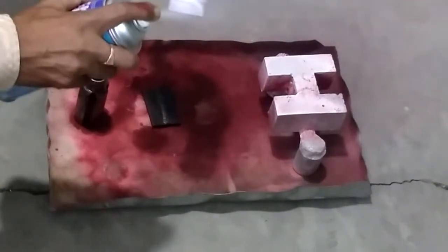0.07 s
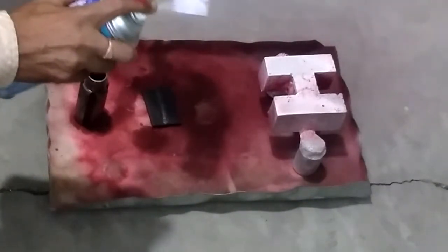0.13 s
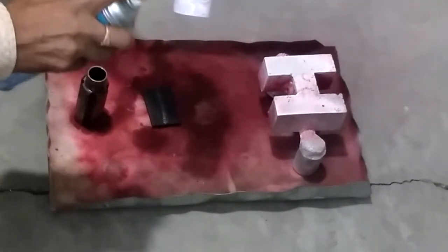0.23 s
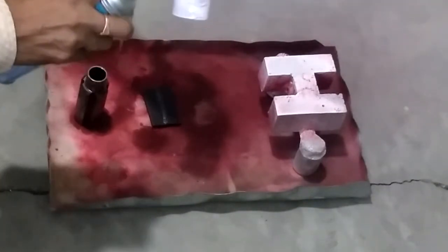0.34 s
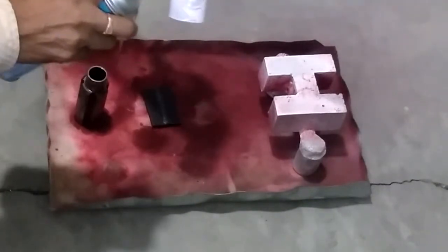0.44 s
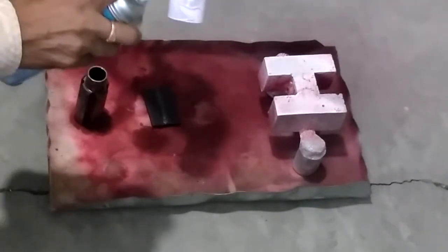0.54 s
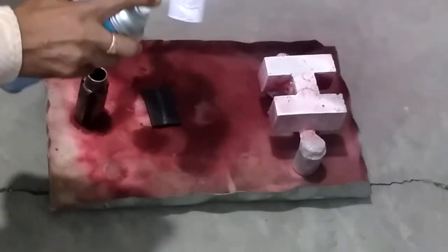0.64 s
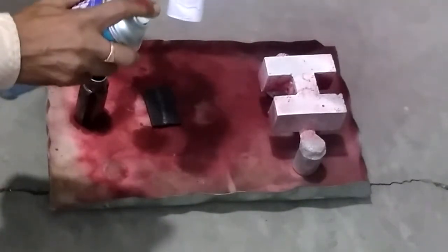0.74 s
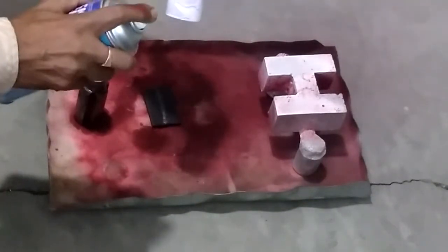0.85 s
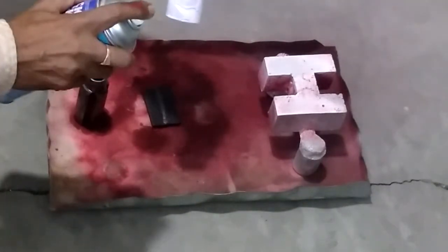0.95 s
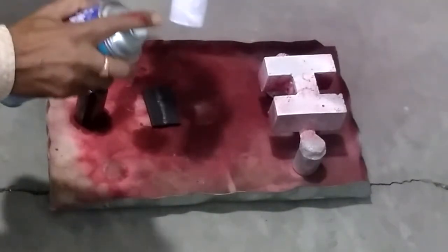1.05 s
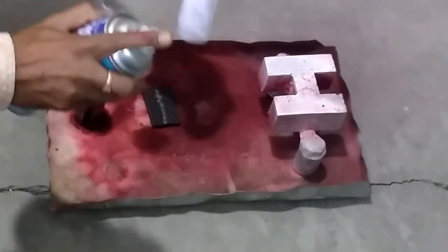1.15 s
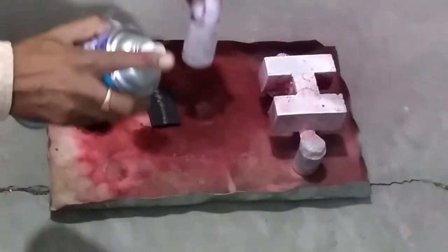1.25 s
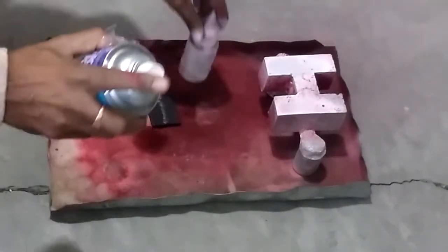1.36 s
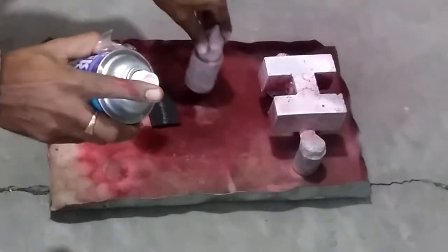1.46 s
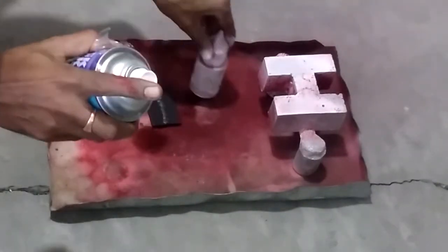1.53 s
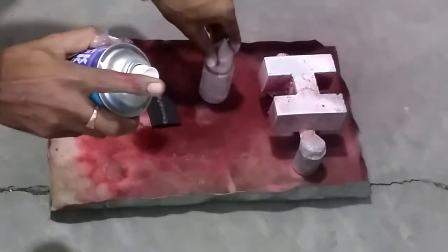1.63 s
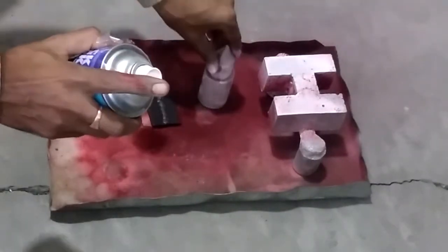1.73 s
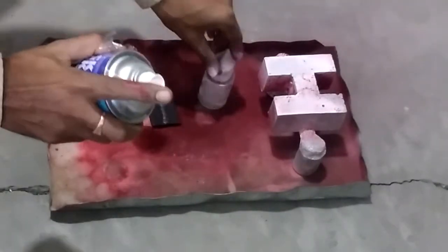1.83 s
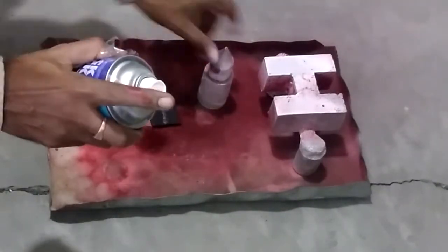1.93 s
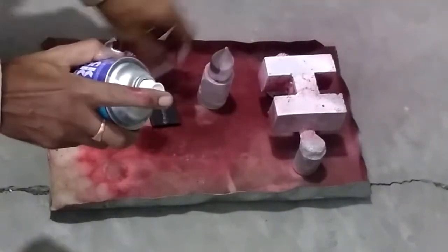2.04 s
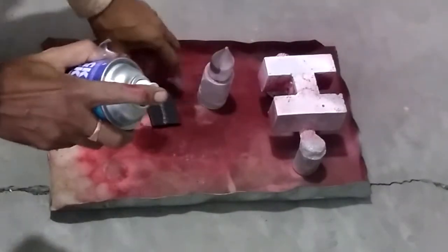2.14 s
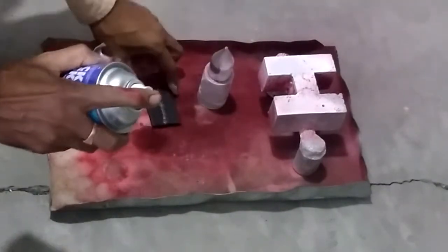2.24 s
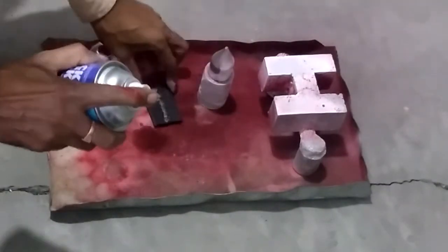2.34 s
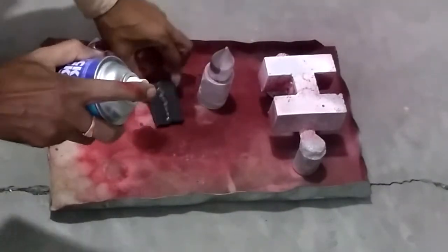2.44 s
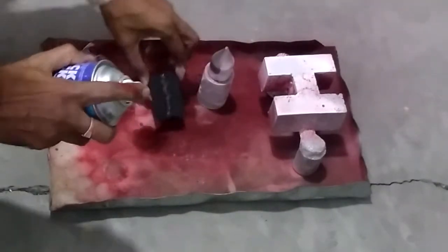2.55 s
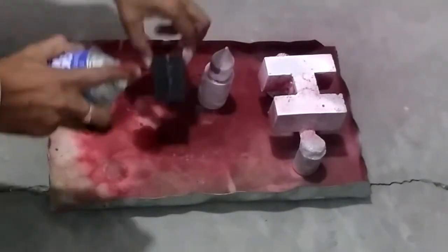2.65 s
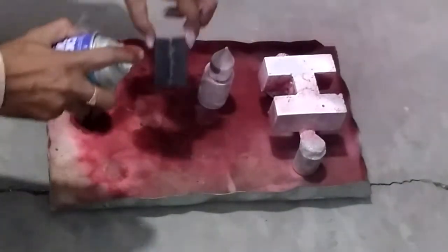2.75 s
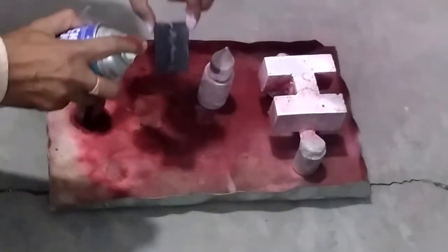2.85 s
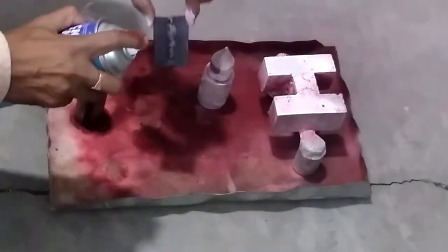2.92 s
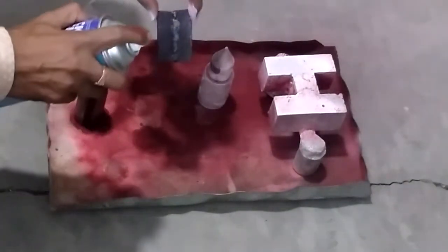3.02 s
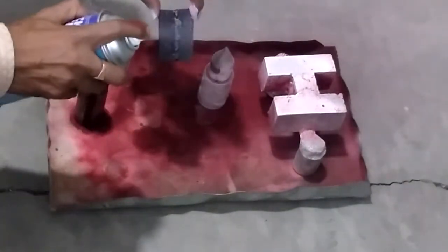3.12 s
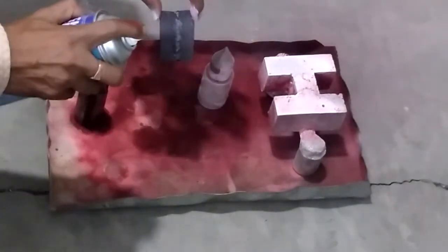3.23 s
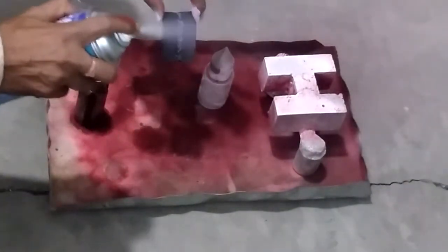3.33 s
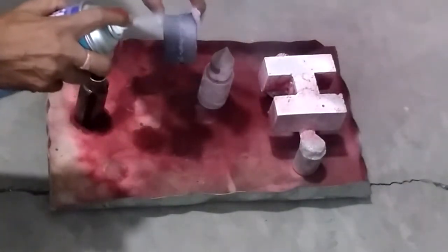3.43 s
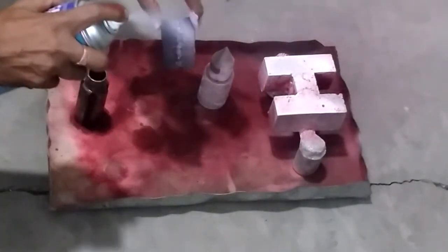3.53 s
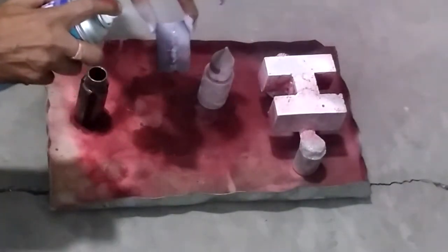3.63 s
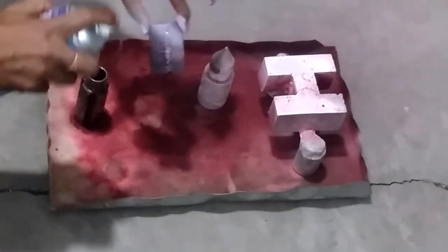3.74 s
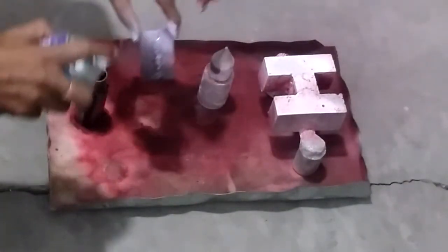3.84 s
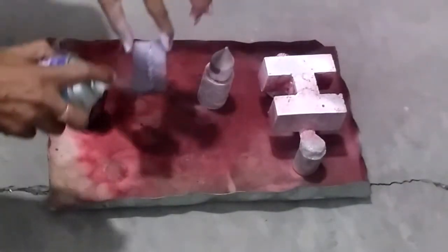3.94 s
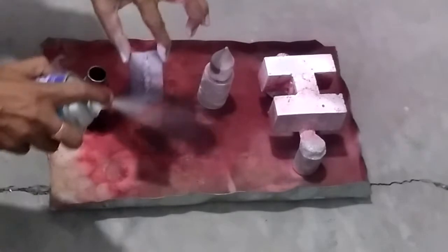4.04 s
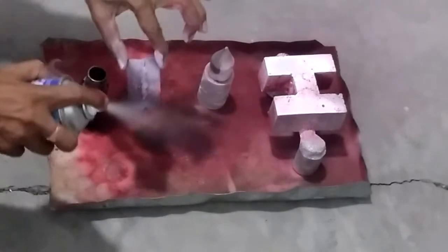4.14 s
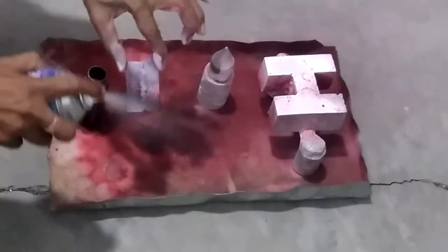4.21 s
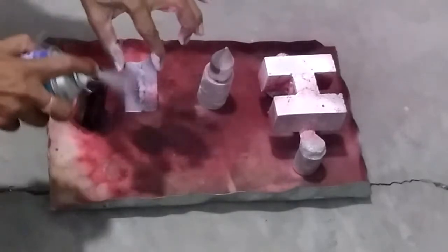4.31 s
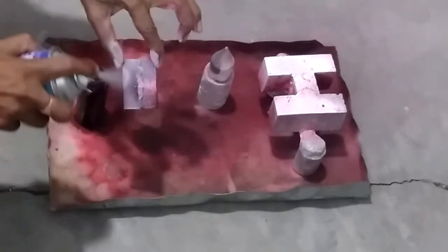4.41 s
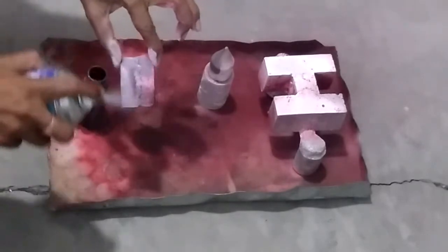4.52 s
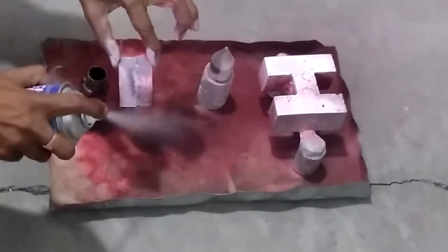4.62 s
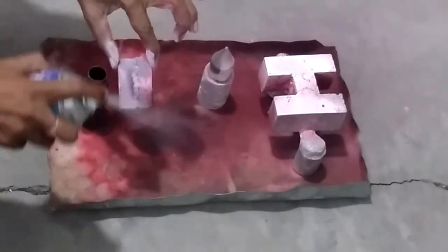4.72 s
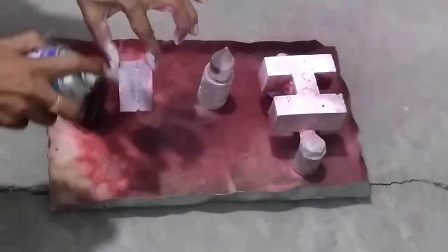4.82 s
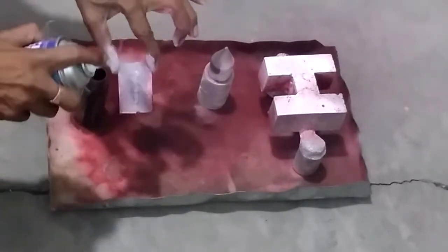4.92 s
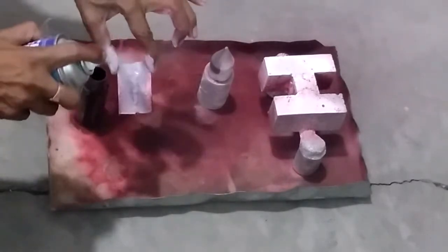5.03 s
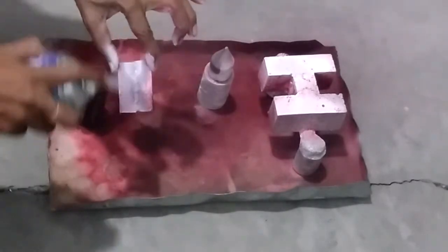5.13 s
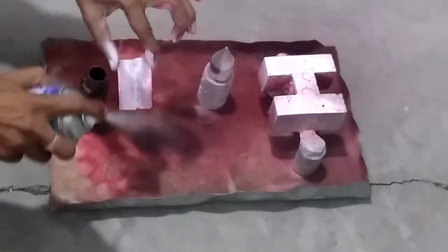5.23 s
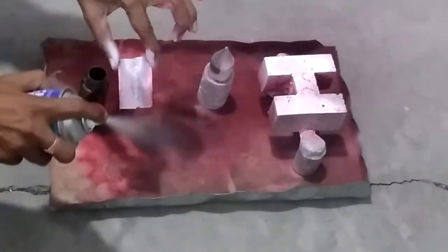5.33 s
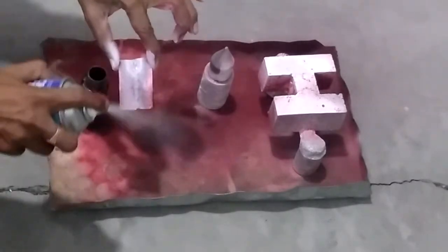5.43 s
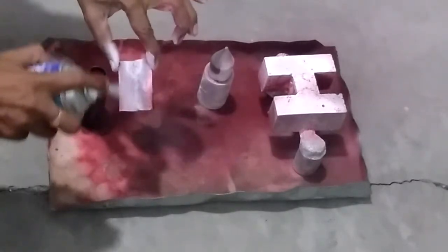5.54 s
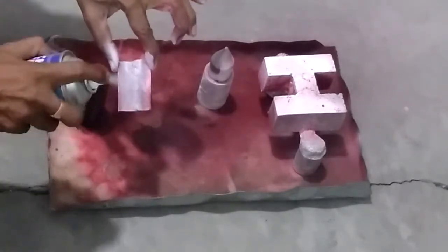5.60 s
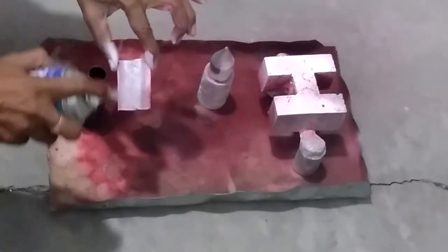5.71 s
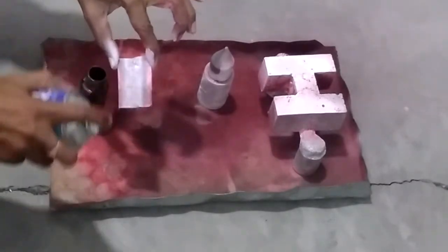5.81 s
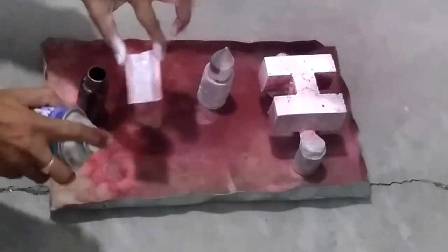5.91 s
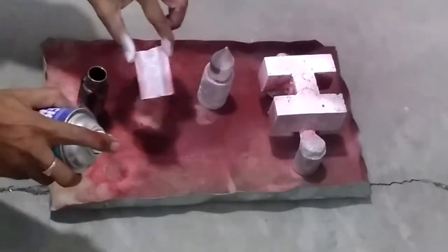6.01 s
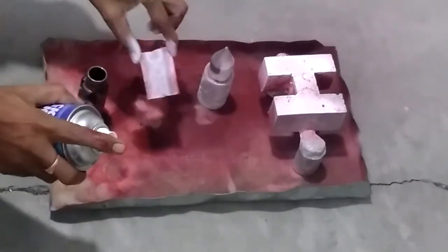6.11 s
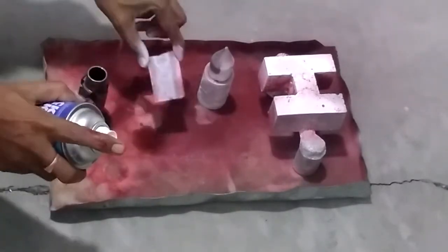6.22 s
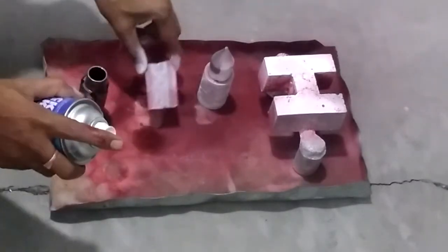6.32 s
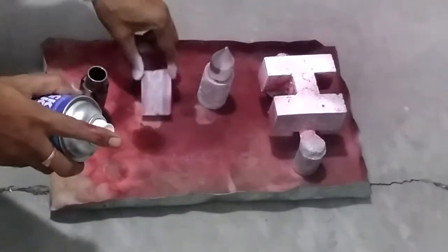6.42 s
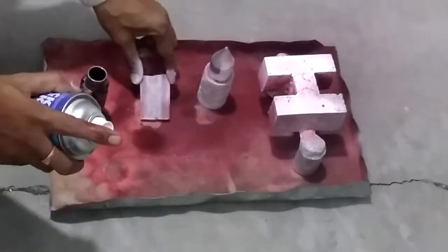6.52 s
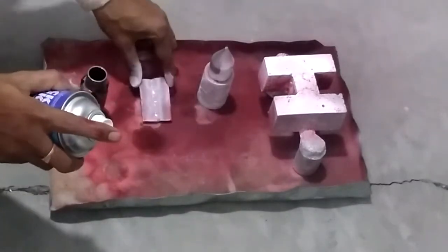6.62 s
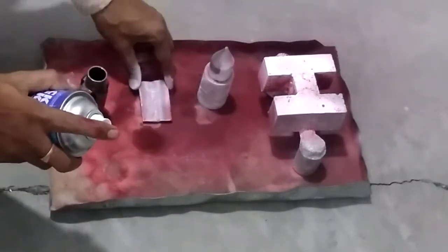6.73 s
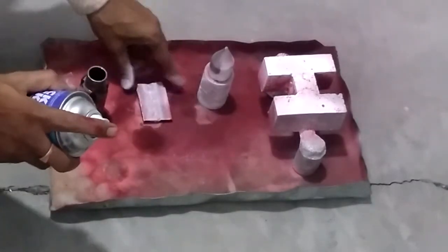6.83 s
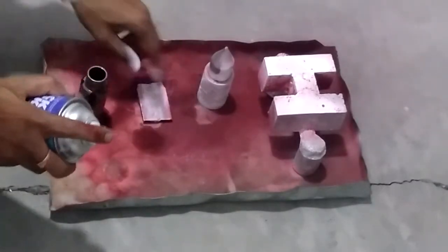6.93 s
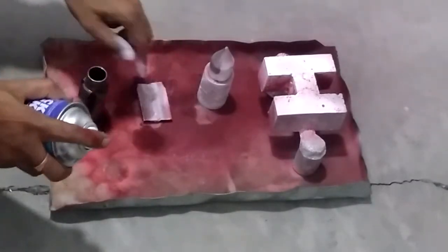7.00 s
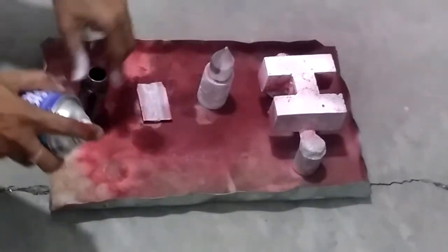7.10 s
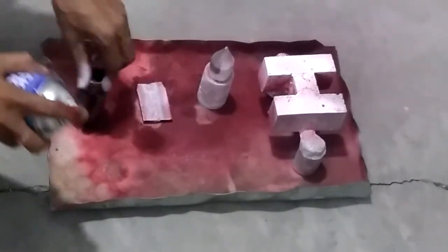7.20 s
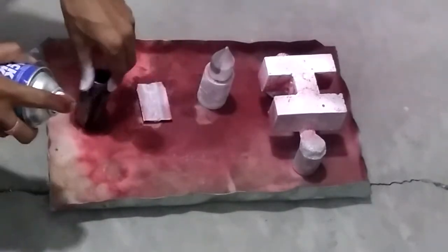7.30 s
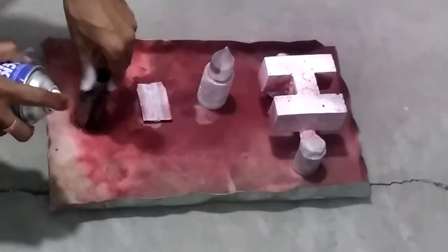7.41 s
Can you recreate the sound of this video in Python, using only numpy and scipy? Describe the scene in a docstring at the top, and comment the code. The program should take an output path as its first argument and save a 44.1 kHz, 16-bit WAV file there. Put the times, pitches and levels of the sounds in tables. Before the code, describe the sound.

A close aerosol can is already spraying at 0 s: a rushing mid-range noise with a hollow resonance near 700 Hz, a small spurt at 0.2 s, and wavering treble until it shuts off at 0.6 s with a brief room tail. Low rumble and very faint high hiss remain; a tiny metallic tick comes at 1.0 s. At 1.7-1.85 s a steel part lands in a quick bright clack. A soft drag and dull tap follow at 2.2-2.35 s with a faint low drone. At 3.0 s a longer, brighter spray begins, thin and hissy, fuller from 3.3 s, thinner around 3.8-3.9 s, then strong and hollow from 4 s until 5.7 s. The valve spits fine high chirps and a squeak until 6.2 s, over a faint drone. Dull knocks come at 6.45-6.55 s, a strong one at 6.75 s, then clatter from 7.1 to 7.45 s in the hard room.

```python
"""An aerosol can, close to two spaced microphone ports, sprays small steel parts in a hard room.
The nozzle hisses, the jet rushes over the part, and the hollow between hand and part resonates:
three shaped noises that follow the aim. The nozzle spurts, and once let go the valve spits.
After each burst, parts clatter on a board on the concrete floor, as blows into ringing modes; one drags.
A small tick, a low drone, room rumble and faint bands of steady hiss lie around the spraying."""
import sys
import numpy as np
from scipy import signal
from scipy.fft import rfft, irfft, next_fast_len
from scipy.io import wavfile
from scipy.ndimage import uniform_filter1d, map_coordinates

SR = 44100
rng = np.random.default_rng(int(sys.argv[2]) if len(sys.argv) > 2 else 0)


def digitize_waveform(pressure):
    """Quantize a signal to 16-bit integers and store it at the path in sys.argv[1].

    Rows of a 2-D input are taken as channels; values are limited to [-1, 1].
    """
    field = np.atleast_2d(pressure).T
    bounded = np.clip(field, -1, 1)
    quanta = np.round(bounded * 32767).astype(np.int16)
    wavfile.write(sys.argv[1], SR, quanta)


N = 328986

# the hollow between hand and part, sharpest when the part is low over the board:
# (time [s], resonance [Hz], sharpness [Q])
HOLLOW_TRACK = [(0, 710, 8.2), (.37, 760, 7), (.62, 625, 7.5), (3.33, 710, 6.2), (3.45, 670, 3.7),
                (3.58, 624, 3.9), (3.75, 610, 2.8), (4.03, 674, 7.1), (4.6, 668, 11.7), (5.18, 643, 10.4),
                (5.34, 724, 7.5), (5.56, 650, 11), (5.68, 674, 7.5)]
SPRAY_PATCHY_DB = 1.3  # depth of the drifting patches in jet and rush


def amp(db):
    """Decibels to gain."""
    return 10 ** (np.asarray(db) / 20)


def unit(x):
    """Scale to rms 1."""
    return x / np.sqrt(np.mean(x ** 2) + 1e-20)


def along(points, hz):
    """(frequency [Hz], value) points read on a log frequency axis."""
    f, v = np.transpose(points)
    return np.interp(np.log(hz + 1), np.log(f + 1), v)


def wobble(rate):
    """A smooth random curve, rate knots a second."""
    knots = rng.standard_normal(int(N * rate / SR) + 4)
    return map_coordinates(knots, [np.arange(N) * rate / SR])


def held(start, end, attack_s, t60):
    """A gain that rises from start, holds, and dies away after end."""
    t = np.arange(N) / SR
    return np.clip((t - start) / attack_s, 0, 1) * amp(-60 * np.maximum(t - end, 0) / t60)


def curve(rows):
    """(time [s], level [dB]) rows as one value per sample, 0 dB after the last."""
    return np.interp(np.arange(N) / SR, *np.transpose(rows), right=0)


def panned(pair, pan_db):
    """Make the left louder than the right by pan_db."""
    return pair * amp([[pan_db / 2], [-pan_db / 2]])


def filtered(x, response):
    """x times a response of frequency."""
    m = next_fast_len(x.shape[-1] + SR // 2)
    return irfft(rfft(x, m) * response(np.fft.rfftfreq(m, 1 / SR)), m)[..., :x.shape[-1]]


def noise_band(centre_hz, half_width_hz):
    """Two noises, together of rms 1, around one frequency, at half gain half_width_hz away from it."""
    noise = rng.standard_normal((2, N))
    return unit(filtered(noise, lambda hz: 1 / (1 + ((hz - centre_hz) / half_width_hz) ** 2)))


def causal(gain):
    """The minimum-phase response of a gain: it rings only after the blow."""
    cepstrum = irfft(np.log(np.maximum(gain, 1e-6)))
    half = len(cepstrum) // 2
    cepstrum[1:half] *= 2
    cepstrum[half + 1:] = 0
    return np.exp(rfft(cepstrum))


def turbulence(gain, patchy_db, size=1024):
    """Two noises, together of rms 1, coloured by gain(hz, s), with drifting patches of strength."""
    hz, s, z = signal.stft(rng.standard_normal((2, N)), SR, nperseg=size)
    field = uniform_filter1d(rng.standard_normal(z.shape[1:]), size=5, axis=0)
    field = uniform_filter1d(field, size=14, axis=1)
    coloured = z * gain(hz[:, None], s) * amp(patchy_db * unit(field))
    return unit(signal.istft(coloured, nperseg=size)[1][:, :N])


def ports(pair, focus):
    """Two spaced microphone ports share the first signal; the second, stronger at low focus, parts them."""
    # how closely left and right match at each frequency: (frequency [Hz], likeness [0-1])
    likeness = [(40, .8), (150, .3), (500, .75), (1150, .97), (1650, .6), (2050, .9), (2280, .999),
                (2850, .999), (3150, .5), (3650, .99), (4250, .5), (4680, .997), (5150, .997), (5600, .45),
                (6250, .85), (6900, .5), (7450, .98), (7950, .5), (8500, .88), (9300, .55), (15000, .65)]
    # how far the left leads: (frequency [Hz], lead [cycles])
    left_lead = [(50, -.5), (450, -.1), (1350, 0), (1750, .25), (2150, .49), (2850, .51), (3500, .98),
                 (3900, 1.02), (4700, 1.48), (5150, 1.52), (6250, 2), (8500, 3), (9700, 3.38),
                 (10600, 3.55), (11800, 4), (15400, 5.5)]
    # left over right: (frequency [Hz], level [dB])
    left_over_right = [(200, -1), (600, 1), (1150, -0.5), (1650, -6.5), (2250, 0), (5200, 0), (5900, -1.5),
                       (8300, -0.5), (9700, -5.5), (15000, -4.5)]

    def split(hz):
        turn = np.arccos(np.clip(focus * along(likeness, hz), 0, 1)) / 2
        return np.array([np.cos(turn), np.sin(turn)])

    sign = np.array([[1], [-1]])  # left, right

    def spacing(hz):
        lead = np.exp(1j * np.pi * sign * np.interp(hz, *np.transpose(left_lead)))
        return lead * amp(sign * along(left_over_right, hz) / 2)

    shared, apart = filtered(pair, split)
    return filtered(shared + sign * apart, spacing)


def room(direct, hold_s, early_t60, late_t60, late_db, size=1):
    """A fresh pair of responses, for the shared and the parting signal: near reflections, duller far walls."""
    reflections_per_s, wall_hz = 4000, 4500
    t = np.arange(SR * 3 // 4) / SR
    # the near reflections keep full strength for hold_s, then fade
    fade = amp(-60 * np.maximum(t - hold_s, 0) / early_t60)
    arrives = rng.random((2, len(t))) < reflections_per_s / SR
    early = rng.standard_normal((2, len(t))) * arrives * fade
    late = filtered(rng.standard_normal((2, len(t))), lambda hz: 1 / np.hypot(1, hz / wall_hz))
    late = late * amp(late_db - 60 * t / late_t60)
    response = early / np.linalg.norm(early, axis=1, keepdims=True) + late / np.linalg.norm(fade)
    # the direct sound, softened over size samples, goes to the shared signal alone
    pulse = np.hanning(size + 2)[1:-1]
    response[0, :size] += direct * pulse / pulse.sum()
    return response


def in_room(hits, **settings):
    """Hits heard directly and by way of the room."""
    return signal.fftconvolve(hits[None], room(**settings), axes=1)[:, :N]


def hollow_bell(hz, s, ratio, q):
    """A resonance peak at ratio times the hollow's pitch, which shifts with the hand."""
    hollow_s, hollow_hz, _ = np.transpose(HOLLOW_TRACK)
    centre_hz = np.interp(s, hollow_s, ratio * hollow_hz)
    return 1 / (1 + (q * (hz / centre_hz - centre_hz / (hz + 1))) ** 2)


def reflected(x):
    """x and its reflection off the board: a comb that shifts as the can moves."""
    # lag of the reflection: (time [s], lag [ms])
    board_lag = [(0, 1.17), (.2, 1.22), (.6, 1.19), (3.0, 1.55), (3.6, 1.5), (4.0, 1.15), (4.3, 1.2),
                 (4.7, 1.21), (4.98, 1.27), (5.25, 1.12), (5.7, 1.16)]
    echo_db = -18
    t = np.arange(N) / SR
    lag_s = np.interp(t, *np.transpose(board_lag)) / 1000
    return x + amp(echo_db) * np.array([map_coordinates(c, [(t - lag_s) * SR]) for c in x])


def jet():
    """The nozzle's turbulent hiss, combed by its reflection off the board."""
    # colour of the hiss: (frequency [Hz], level per Hz [dB])
    jet_colour = [(300, -44), (2000, -33), (4000, -15), (6500, -6.5), (7500, -4.5), (9300, -4.5),
                  (10000, 0), (11200, 0.5), (12300, -3.5), (13200, 3.5), (14300, -1.5), (15600, -0.5)]
    # extra hiss while the round pin is sprayed: (time [s], level [dB])
    pin_treble = [(0, 0), (.12, 1.5), (.23, -4.5), (.34, 4.5), (.46, 6.5), (.56, 4), (.62, -4), (.8, 14)]
    hiss = turbulence(lambda hz, s: amp(along(jet_colour, hz)), patchy_db=SPRAY_PATCHY_DB)
    return amp(curve(pin_treble)) * reflected(hiss)


def rush(part_colour):
    """The jet breaks into noise on the part, whose reflection weakens a band above the hollow's pitch."""
    def colour(hz, s):
        return amp(along(part_colour, hz)) * amp(-7 * hollow_bell(hz, s, ratio=1.58, q=8.5))
    return turbulence(colour, patchy_db=SPRAY_PATCHY_DB)


def hollow():
    """The jet blows the air between hand and part into an unsteady resonance."""
    hollow_s, _, hollow_q = np.transpose(HOLLOW_TRACK)

    def resonance(hz, s):
        q = np.interp(s, hollow_s, hollow_q)
        # a blunter hollow spreads its power over a wider band
        return np.sqrt(q) * hollow_bell(hz, s, ratio=1, q=q) ** 0.59

    return amp(1.3 * wobble(14)) * turbulence(resonance, patchy_db=1.0, size=2048)


def spray():
    """The valve gates hiss, rush and hollow together, and the aim sets how strongly each sounds."""
    # presses of the nozzle: (start [s], end [s], jet level [dB], rush level [dB], hollow level [dB],
    # jet left over right [dB], focus of rush and hollow [0-1])
    bursts = [(-0.02, 0.619, -43, -39.5, -42, 1.5, 0.95), (3.002, 5.694, -31, -38, -39.5, 0.5, 1)]
    # rush on the round pin, then on the flat block, each: (frequency [Hz], level per Hz [dB])
    part_colours = [
        [(40, -40), (200, -24), (450, -7), (950, -1), (1400, -4), (1800, -3), (2050, -6), (2400, 3), (2700, -1),
         (3080, -16), (4000, -8), (5700, -10), (7400, -22), (15000, -26)],
        [(40, -40), (200, -18), (450, -7), (850, -3), (1150, 0), (1950, -2.5), (2300, 2), (2680, 2.5),
         (2950, -11), (3400, -5), (4400, -4.5), (5800, -8.5), (7500, -14), (15000, -22)],
    ]
    # how fully the jet meets the part; it slips past the edge twice: (time [s], level [dB])
    aim = [(0, 1), (.6, -1), (3.01, -16), (3.13, -9), (3.23, -9.5), (3.275, -1), (3.6, -1.5), (3.81, -11),
           (3.91, -9.5), (3.99, 0.8), (4.1, 0.5), (4.17, -1), (4.35, -1), (4.42, 0.5), (4.52, -.5),
           (4.68, 1.5), (4.88, -2.5), (5.33, 1), (5.48, -.5), (5.7, -1)]
    hollow_follows = 1.8  # dB of hollow for each dB of aim
    open_s, shut_t60 = 0.008, 0.16  # the valve snaps open and shuts a little slower
    hang_db, hang_t60 = -7, 0.3  # the room holds the spray for a moment
    aim_db = curve(aim)
    out = np.zeros((2, N))
    for (start, end, jet_db, rush_db, hollow_db, jet_pan_db, focus), colour in zip(bursts, part_colours):
        hang = amp(hang_db) * held(start, end, open_s, hang_t60)
        valve = np.maximum(held(start, end, open_s, shut_t60), hang)
        hiss = amp(jet_db + aim_db) * jet()
        on_part = amp(rush_db + aim_db) * rush(colour)
        in_hand = amp(hollow_db + hollow_follows * aim_db) * hollow()
        out += valve * (panned(ports(hiss, focus=1), jet_pan_db) + ports(on_part + in_hand, focus))
    # paint and gas leave the nozzle unevenly
    return out * amp(0.54 * wobble(40) + 0.16 * wobble(360))


def background():
    """Low room rumble, a drone that comes and goes, and two faint steady bands of high hiss."""
    # colour of the rumble: (frequency [Hz], level per Hz [dB])
    rumble_colour = [(25, -36), (55, -27), (78, 0), (130, -1), (230, -0.5), (400, -9), (700, -14.5),
                     (1200, -23.5), (2000, -24.5), (2450, -27.5), (2900, -22.5), (3500, -28.5), (6000, -34),
                     (15500, -39.5)]
    # swells of the drone: (start [s], end [s], level [dB])
    drone_swells = [(1.97, 2.674, -50.5), (5.95, 6.403, -54.5)]
    # steady hiss: (frequency [Hz], half-width [Hz], level [dB])
    hiss_bands = [(8710, 380, -72.5), (9700, 330, -78.5)]
    rumble = turbulence(lambda hz, s: amp(along(rumble_colour, hz)), patchy_db=1.03)
    rumble = rumble * amp(-48.0 + 0.6 * wobble(2.255))  # a slow drift in level
    swells = sum(amp(db) * held(start, end, attack_s=0.096, t60=0.83) for start, end, db in drone_swells)
    drone = swells * (noise_band(121.0, 6.1) + amp(0.5) * noise_band(212, 130))
    hiss = sum(amp(db) * noise_band(hz, half_width_hz) for hz, half_width_hz, db in hiss_bands)
    return rumble + drone + hiss


def spurts():
    """Short puffs of coloured noise from the nozzle."""
    # on a clot of paint, and as the nozzle opens: (time [s], level [dB])
    puff_times = [(.218, -39), (3.002, -48)]
    # colour of a puff: (frequency [Hz], level per Hz [dB])
    puff_colour = [(200, -25), (750, 1), (1500, -9), (3000, -5), (7000, -15), (13000, -1)]
    puffs = sum(amp(db) * held(s, s + 0.0029, attack_s=0.0013, t60=0.035) for s, db in puff_times)
    noise = rng.standard_normal((2, N))
    return puffs * unit(filtered(noise, lambda hz: amp(along(puff_colour, hz))))


def tick():
    """One short metallic ring of narrow noise while the can is turned."""
    # (time [s], level [dB], pitch [Hz], t60 [s])
    can_tick = (1.03, -53.5, 2900, .12)
    s, db, pitch_hz, t60 = can_tick
    return amp(db) * held(s, s, attack_s=0.0017, t60=t60) * noise_band(pitch_hz, 300)


def board(hz, bright_hz, thud_db):
    """A soft contact loses its treble; a flat, heavy one pushes the low end; each blow finds the modes anew."""
    # colour of a blow as it reaches the ports: the board's own colour, with a lift near 8.8 kHz from the ports:
    # (frequency [Hz], level per Hz [dB])
    board_colour = [(60, -27.5), (160, -32), (230, -14.5), (330, -14), (410, -19), (500, -10), (660, -9),
                    (780, -10), (1020, 0.5), (1400, -6), (1900, -3.5), (2300, -7), (2800, -10),
                    (3300, -9.5), (5000, -15.5), (6300, -16.5), (7500, -19.5), (8800, -15), (10500, -16.5),
                    (15500, -23)]
    # resonances of board and parts: (frequency [Hz], width [Hz], lift before scatter [dB])
    modes = [(238, 25, 7), (328, 25, 6), (525, 20, 5), (598, 14, 10), (695, 14, 8), (840, 14, 7),
             (1047, 14, 7), (1143, 22, 11), (1222, 20, 4), (1313, 16, 9), (1403, 16, 6), (1470, 16, 6),
             (1514, 16, 6), (1626, 22, 8), (1812, 20, 6), (1942, 40, 7), (3080, 50, 4), (3371, 16, 7),
             (4340, 18, 7)]
    scatter_db, thud_hz = 1.8, 780
    ring = 1
    for f, width, db in modes:
        lift = amp(db + scatter_db * rng.standard_normal()) - 1
        ring = ring + lift / (1 + (2 * (hz - f) / width) ** 2)
    # the steel edge always adds a little click, stronger for a brighter contact
    edge = amp(-23.5) * bright_hz / 3000
    contact = np.hypot(1 / np.sqrt(1 + (hz / bright_hz) ** 4.6), edge)
    thud = thud_db / (1 + (hz / thud_hz) ** 4)
    return causal(amp(along(board_colour, hz) + thud) * ring * contact)


def knocks():
    """Steel parts land on the board and rock from edge to edge, each further contact weaker."""
    # parts set down: (time [s], relative level [dB], contact brightness [Hz], thud [dB], rebound [0-1])
    landings = [(1.681, -14.5, 4300, -11, 0), (1.693, -16.5, 6460, -9, 0), (1.704, -17.5, 5500, -9, 0.15),
                (1.830, -19, 5530, -0.5, 0.38), (2.170, -46, 1660, 3.5, 0.2), (2.236, -48, 2200, 0, 0.3),
                (2.333, -26.5, 1870, 0.5, 0), (6.439, -25.5, 1460, 12.5, 0.2), (6.450, -22, 1800, 7, 0.47),
                (6.513, -43, 4860, 4, 0.5), (6.551, -22.5, 1520, 0.5, 0.05), (6.652, -38, 1400, 6, 0.3),
                (6.746, -12, 2850, 3, 0.47), (7.125, -30.5, 12700, -13, 0.57),
                (7.162, -30.5, 1700, -6, 0.9), (7.175, -15.5, 3030, -3, 0.63),
                (7.202, -21.5, 2550, 0.5, 0.58), (7.288, -23.5, 9800, -3, 0.4), (7.425, -35, 6500, 3, 0.26),
                (7.445, -38.5, 1710, 9.5, 0.6)]
    # decay of near reflections and far walls: (early t60 [s], late t60 [s])
    room_t60 = (.145, .62)
    rock_s = 0.014  # time from edge to edge
    out = np.zeros((2, N + SR))
    for s, db, bright_hz, thud_db, rebound in landings:
        for k in range(3):
            # the treble comes mostly by way of the room: the direct sound is weak and soft
            echo = room(0.31, 0.01, *room_t60, late_db=-12.0, size=13)
            blow = filtered(echo, lambda hz: board(hz, bright_hz, thud_db))
            at = round((s + k * rock_s) * SR)
            out[:, at:][:, :blow.shape[1]] += amp(db + 41.0) * np.clip(rebound, 0, 1) ** k * blow
    return out[:, :N]


def drag():
    """The block catches and slips over the board, ringing its modes, growing brighter along the stroke."""
    # the stroke before the block is lifted: (start [s], end [s], level [dB])
    stroke = (2.18, 2.275, -46.5)
    slips_per_s, rough_db = 420, 3
    start, end, db = stroke
    slips = (rng.random(N) < slips_per_s / SR) * amp(rough_db * wobble(60))
    wet = in_room(slips, direct=0.8, hold_s=0, early_t60=0.047, late_t60=0.4, late_db=-17)
    dull = unit(filtered(wet, lambda hz: board(hz, bright_hz=1050, thud_db=5)))
    bright = unit(filtered(wet, lambda hz: board(hz, bright_hz=1800, thud_db=5)))
    progress = np.clip((np.arange(N) / SR - start) / (end - start), 0, 1)
    rub = (1 - progress) * dull + progress * bright
    return amp(db) * held(start, end, attack_s=0.048, t60=0.72) * rub


def sputter():
    """The nearly closed valve spits tiny high rings in quick runs; the fastest merges into a squeak."""
    # runs: (start [s], end [s], relative level [dB], rate [spits/s], unevenness [fraction of a gap])
    runs = [(5.712, 5.777, -53, 174, 0.07), (5.82, 5.85, -55, 230, 0.12), (5.855, 5.892, -56, 160, .12),
            (5.911, 5.98, -56, 160, .1), (6.001, 6.05, -54, 250, .05), (6.088, 6.113, -53, 653, 0),
            (6.154, 6.19, -62, 140, 0.26)]
    # ring of one spit: (frequency [Hz], level [dB])
    spit_ring = [(3000, -58), (7600, -31), (8150, -15), (8450, -3), (8750, 0.5), (9000, -9), (9600, -11),
                 (10150, -21), (15500, -55)]
    scatter_db = 1.8
    spits = np.zeros(N)
    for start, end, db, rate, uneven in runs:
        times = np.arange(start, end, 1 / rate)
        chance = rng.standard_normal((len(times), 2))
        at = ((times + uneven * chance[:, 0] / rate) * SR).astype(int)
        # a quicker run has weaker spits, for the same power
        spits[at] += amp(db + scatter_db * chance[:, 1]) * np.sqrt(SR / rate)
    wet = in_room(spits, direct=1.95, hold_s=0, early_t60=0.1, late_t60=0.4, late_db=-27)
    return amp(11.5) * filtered(wet, lambda hz: causal(amp(along(spit_ring, hz))))


def scene():
    """The can is close to the ports; the parts lie slightly right and, like the background, less focused."""
    can = spray() + ports(spurts(), focus=1) + ports(sputter(), focus=0.58)
    parts = panned(ports(knocks() + drag(), focus=0.83), pan_db=-0.5)
    return can + parts + ports(background() + tick(), focus=0.93)


def record(dry):
    """The recorder behind the ports cuts the deepest bass and keeps nothing above its band limit."""
    low_cut_hz, top_hz = 66, 15780

    def band_limits(hz):
        top = 1 / (1 + (hz / top_hz) ** 300)
        return top * hz / np.hypot(hz, low_cut_hz)

    return filtered(dry, band_limits)


dry = scene()
out = record(dry)
digitize_waveform(out)
```